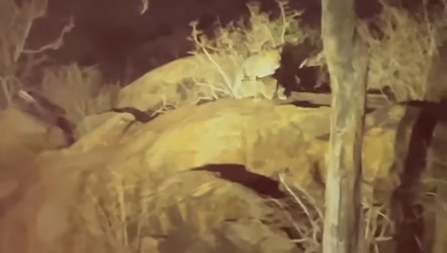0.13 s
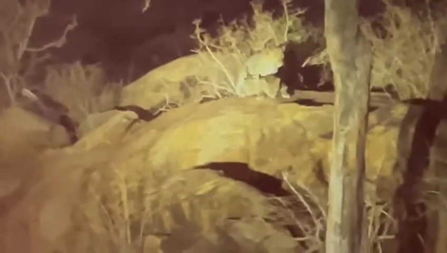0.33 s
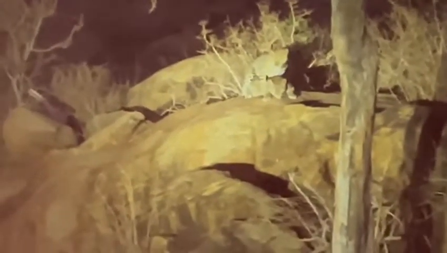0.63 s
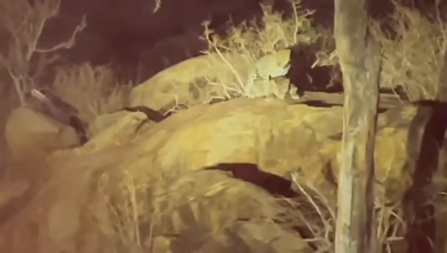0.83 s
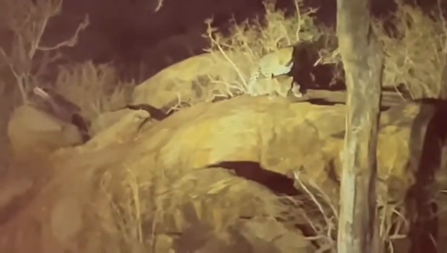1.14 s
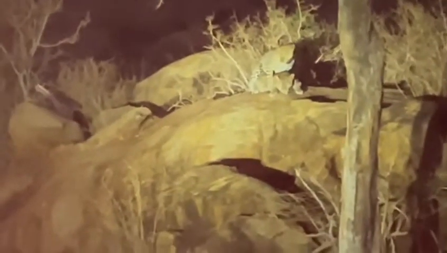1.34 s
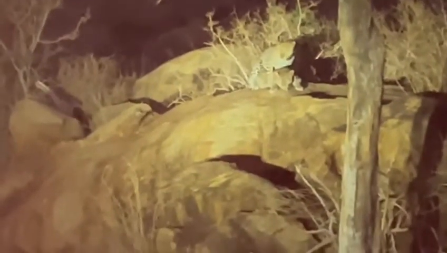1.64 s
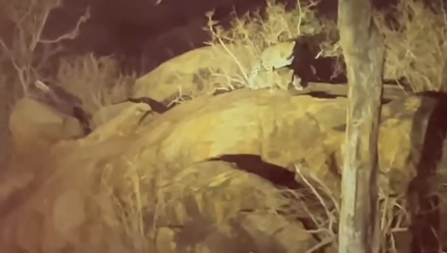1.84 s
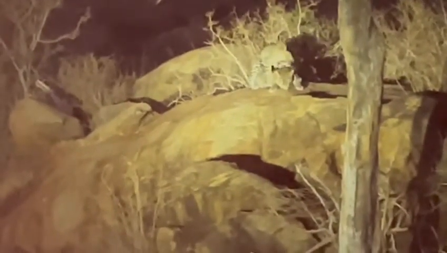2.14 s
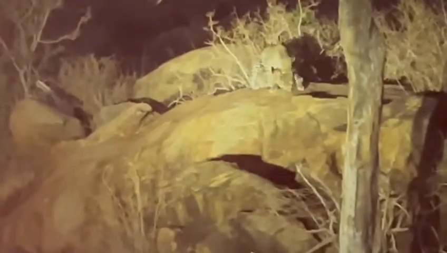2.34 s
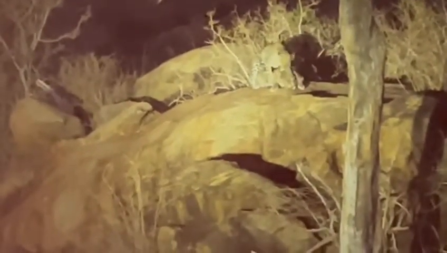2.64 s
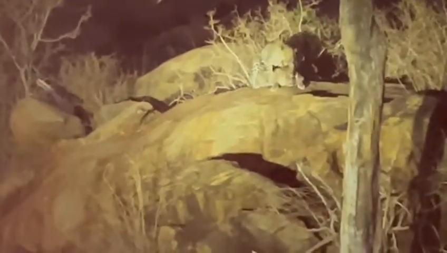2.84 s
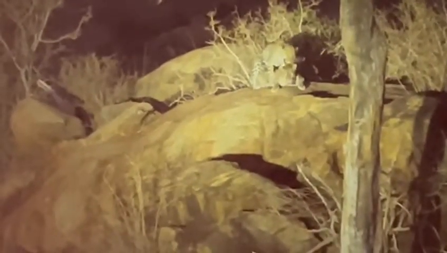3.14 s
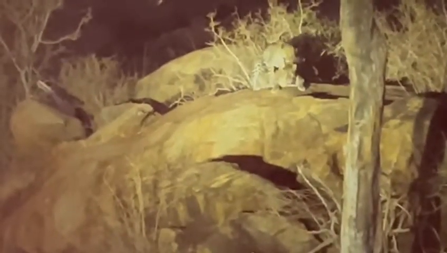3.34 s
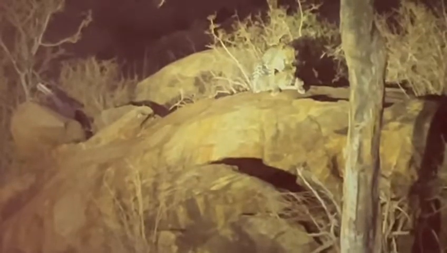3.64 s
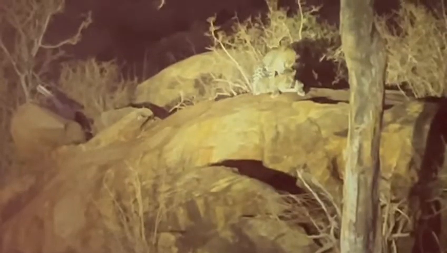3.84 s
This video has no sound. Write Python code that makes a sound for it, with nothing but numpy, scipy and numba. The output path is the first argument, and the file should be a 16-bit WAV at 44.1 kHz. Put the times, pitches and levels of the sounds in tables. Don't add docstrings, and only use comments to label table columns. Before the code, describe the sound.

A leopard's low, raspy growl begins around 2.2 seconds, first a rumbling string of throat pulses, then from 2.9 a brighter, breathy flutter lasting to the 4-second end. Throughout, wind rumbles and thumps the microphone, strongest near 3.7, over bush hiss and a faint throbbing cricket. Dry leaves rustle near 0.7, 1.7 and 2.7-3.0; a thin bird peep sounds at 0.7. Faint rock echoes.

```python
import sys
import numpy as np
from scipy import signal
from scipy.io import wavfile
from scipy.ndimage import uniform_filter1d
from numba import njit

SR = 44100
rng = np.random.default_rng(int(sys.argv[2]) if len(sys.argv) > 2 else 0)


def output_pcm(signal):
    pcm = np.clip(np.atleast_2d(signal).T, -1, 1) * 32767
    wavfile.write(sys.argv[1], SR, np.round(pcm).astype(np.int16))


def level_to_linear(level):
    exponent = np.asarray(level, float) / 20
    return 10 ** exponent


N = 176400


@njit
def svf(x, hz, width):
    y, b, l = np.empty((2, len(x))), 0., 0.
    for i in range(len(x)):
        g, k = np.tan(np.pi * hz[i] / SR), width / hz[i]
        v = (b + g * (x[i] - l)) / (1 + g * (g + k))
        y[0, i], y[1, i] = k * v, l + g * v
        b, l = 2 * v - b, l + 2 * g * v
    return y


def band(x, hz, width):
    return svf(x + 1e-18, hz + np.zeros(len(x)), 1. * width)[0]


def resonate(x, hz, width, skirt):
    return band(band(x, hz, width), hz, skirt * width)


def cut(x, hz, kind, order=8):
    return signal.sosfilt(signal.butter(order, hz, kind, fs=SR, output="sos"), x)


def unit(x):
    return x / np.sqrt(np.mean(x ** 2))


def curve(table, col=1):
    return np.interp(np.arange(N) / SR, np.array(table)[:, 0], np.array(table)[:, col])


def walk(rate):
    k = int(SR / rate)
    held = np.repeat(rng.standard_normal(N // k + 1), k)
    return 1.27 * uniform_filter1d(uniform_filter1d(held, k), k)[:N]


def air(table, flicker_db, rate, shared):
    f, db = np.array(table).T
    out = 0
    for hz in f[0] * 2 ** np.arange(0, np.log2(f[-1] / f[0]) + .1, .5):
        colour_db = np.interp(np.log(hz), np.log(f), db)
        gain = level_to_linear(colour_db + flicker_db * walk(rate) + shared)
        out = out + gain * resonate(rng.standard_normal(N), hz, hz / 2, 1)
    return unit(out)


def wind():
    # [t/s, level/dB]
    gusts = [(0.0, -34.5), (0.6, -35.5), (0.75, -31), (1.01, -36.5), (1.21, -28), (1.36, -26), (1.51, -32),
             (1.68, -26.5), (1.8, -34), (2.02, -32), (2.7, -28.5), (3.12, -26), (3.39, -29), (3.69, -24),
             (4.0, -26.5)]
    # [f/Hz, level per Hz/dB]
    wind_colour = [(13, -53), (22, -18), (51, 4), (90, 6), (140, -1.5), (447, -14.5), (539, -13.5),
                   (900, -30), (1170, -78), (1980, -120)]
    side_db = -6.5
    shared = 2.8 * walk(20)
    mid = air(wind_colour, 1.96, 18, shared)
    side = cut(air(wind_colour, 2.7, 20, shared), 70, "high", order=1)
    return level_to_linear(curve(gusts) - 1) * np.array([mid, level_to_linear(side_db) * side])


def buffets():
    # [t/s, peak level/dB, flap level against thud/dB, length/s]
    swirls = [(0.079, -29.5, -14, 0.027), (0.249, -18, -7.5, 0.012), (0.285, -21, -21, 0.01),
              (0.359, -17, -15.5, 0.018), (0.614, -23.5, -23, 0.028), (0.682, -11.5, -5.5, 0.014),
              (0.872, -25, -23, 0.012), (1.158, -21.5, 4.5, 0.011), (1.178, -12, 1.5, 0.017),
              (1.261, -11, -4.5, 0.015), (1.329, -25, -5, 0.0051), (1.527, -22, -20, 0.018),
              (1.599, -21, -19, 0.011), (1.613, -17, -4.5, 0.01), (1.661, -21, -23, 0.011),
              (1.694, -15, -9.5, 0.021), (1.815, -17, -15, 0.015), (2.062, -19.5, -24, 0.016),
              (2.174, -23.5, -18, 0.014), (2.326, -19.5, -7.5, 0.014), (2.391, -19, -13, 0.015),
              (2.594, -18, -30, 0.019), (2.951, -13, -6.5, 0.012), (2.985, -11.5, -26, 0.02),
              (3.027, -20, 3.5, 0.027), (3.093, -17, 0, 0.02), (3.164, -16.5, -4.5, 0.015),
              (3.518, -20, -21, 0.014), (3.598, -11.5, -4.5, 0.013), (3.635, -10, -12, 0.0052),
              (3.711, -9, -13, 0.026), (3.754, -14, -4, 0.016), (3.787, -21.5, 4.5, 0.015),
              (3.83, -26.5, -11, 0.011)]
    thud_hz, flap_hz, side_db = 241, 520, -12
    out, t = np.zeros((2, N + SR)), np.arange(SR // 4) / SR
    for s, db, flap_db, length in swirls:
        shape = (t / length * np.exp(1 - t / length)) ** 3
        noise = rng.standard_normal((2, 2, len(t)))
        thud = cut(cut(noise[0], thud_hz, "low", order=3), 49.4, "high", order=2) * shape
        flap = cut(cut(noise[1], flap_hz, "low", order=5), thud_hz, "high", order=2) * shape ** 2
        thud = thud / np.abs(thud[0]).max()
        flap = flap / np.abs(flap[0]).max()
        at = int(max(s - .008, 0) * SR)
        out[:, at:at + len(t)] += level_to_linear(db) * (thud + level_to_linear(flap_db) * flap)
    return out[:, :N] * level_to_linear(np.array([[0], [side_db]]))


def bush():
    # [f/Hz, level per Hz/dB]
    hiss_colour = [(240, 2.5), (400, 0), (1260, -7.5), (1890, -9.5), (4170, -24), (8570, -20), (9710, -35),
                   (10100, -72), (11000, -17), (14300, -58), (22000, -120)]
    level_db, side_db, wide_below_hz = -43, -2, 2300
    swell = 1.1 * walk(24)
    mid = level_to_linear(level_db) * air(hiss_colour, 1.0, 9.1, swell)
    side = cut(air(hiss_colour, 1.0, 12, swell), wide_below_hz, "low")
    return np.array([mid, level_to_linear(level_db + side_db) * side])


def cricket():
    # [f/Hz, width/Hz, level/dB]
    wings = [
        (1802, 250, -46.5),
        (1906, 40, -52.5),
        (5240, 160, -65),
    ]
    rate_hz, decay_cycles = 29, 0.48
    phase = np.cumsum(rate_hz * (1 + 0.018 * walk(2.7))) / SR % 1
    scrape = np.minimum(phase / .15, 1) * np.exp(-phase / decay_cycles) * level_to_linear(1.3 * walk(14))
    out = 0
    for f, width, db in wings:
        wavering = f * (1 + 0.033 * walk(15))
        out = out + level_to_linear(db) * unit(resonate(scrape * rng.standard_normal(N), wavering, width, 4))
    return out


def rustles():
    # [centre t/s, half length/s, f/Hz, width/Hz, level/dB]
    grainy_swells = [(0.733, 0.091, 5100, 1800, -52.5), (0.697, 0.065, 3070, 600, -50),
                     (1.685, 0.073, 7700, 6400, -53), (1.69, 0.084, 2650, 970, -52.5),
                     (1.67, 0.04, 6800, 700, -55), (2.78, 0.11, 2850, 670, -52.5),
                     (2.705, 0.13, 9600, 4600, -57.5), (3.04, 0.067, 8440, 2000, -55)]
    t, out = np.arange(N) / SR, 0
    for s, half, hz, width, db in grainy_swells:
        swell = level_to_linear(db + 2 * walk(58.5)) * np.exp(-((t - s) / half) ** 2)
        out = out + swell * unit(resonate(rng.standard_normal(N), hz, width, 2))
    return out


def peep():
    # [t/s, f/Hz]
    glide = [
        (.645, 2980),
        (.7, 3480),
        (.76, 3300),
        (.825, 3020),
    ]
    tone_db, breath_db, blur_hz = -51.5, -56, 200
    t = np.arange(N) / SR
    gate = np.clip(np.minimum(t - glide[0][0], glide[-1][0] - t) / .03, 0, 1)
    hz = uniform_filter1d(curve(glide), size=900) * (1 + .005 * walk(150))
    tone = np.sin(2 * np.pi * np.cumsum(hz) / SR)
    hoarse = unit(resonate(rng.standard_normal(N), curve(glide), blur_hz, 1))
    return gate * (level_to_linear(tone_db + 3 * walk(90)) * tone + level_to_linear(breath_db) * hoarse)


def growl():
    # [t/s, peak level/dB, length/s, first
    # resonance ring/dB]
    bursts = [(2.196, -17.5, 0.05, 1.5), (2.269, -24, 0.067, 3), (2.318, -26, 0.031, 1.5),
              (2.351, -19.5, 0.072, 1), (2.441, -11, .01, -12), (2.465, -13.5, 0.047, -0.5),
              (2.519, -13.5, 0.018, -0.5), (2.545, -13.5, .02, -3.5), (2.576, -16.5, 0.051, -2),
              (2.617, -14.5, 0.012, -6), (2.647, -16, 0.043, -4.5), (2.698, -9.5, 0.028, -4.5),
              (2.736, -11.5, 0.031, 0), (2.783, -16.5, 0.037, 0.5), (2.818, -14, 0.027, -1),
              (2.853, -17, 0.011, 2), (2.869, -18, 0.027, 0.5),
              (2.907, -15, 0.019, 4), (2.947, -16.5, .034, -13), (2.996, -11.5, 0.014, 0),
               (3.035, -15, 0.027, -0.5), (3.068, -13.5, 0.024, -6.5), (3.117, -16, 0.028, 1),
               (3.167, -26.5, 0.031, 4), (3.198, -11.5, 0.0029, -3.5), (3.237, -15, 0.0086, -7),
               (3.266, -22, 0.016, -3.5), (3.286, -18, 0.024, 0), (3.318, -23, .006, 0),
               (3.331, -16.5, .008, 2), (3.357, -16.5, 0.0096, 6), (3.391, -17, .034, 2.5),
               (3.456, -20.5, 0.02, 4), (3.506, -13.5, 0.017, 1.5), (3.553, -21.5, .034, 2),
               (3.613, -20.5, 0.02, 7), (3.664, -20, .006, 2), (3.679, -14.5, 0.0058, 3),
               (3.705, -21, 0.053, 3.5), (3.784, -21, .006, -4), (3.797, -19, 0.02, 1.5),
               (3.853, -16.5, 0.032, 2.5), (3.917, -14.5, 0.037, -1), (3.984, -16.5, .03, -6)]
    # [t/s, first resonance f/Hz, brightness/dB, lift of upper resonances (ratio), breath/dB]
    mouth = [(2.19, 605, -4, 0.93, -5), (2.32, 545, -15.5, 0.93, -9), (2.52, 520, -17.5, 1.04, 3),
             (2.66, 541, -15, 1.074, -9), (2.74, 574, -8, 1.074, 2), (2.93, 610, -1, 0.973, -5),
             (3.4, 631.5, 1.5, 0.968, 3), (3.7, 629, 1, .98, -3.5), (4.0, 609, -3.5, 0.97, 1)]
    # [f/Hz, width/Hz, level/dB]
    tract = [(1002, 153, -10), (1476, 193, -6), (1968, 293, -4.5), (2290, 376, -5.5), (3480, 720, -20),
             (5500, 5000, -16)]
    pulse_s, gate_s, puff_s, breath_s = .0135, 0.0059, .002, .03
    jitter, scatter_db, waver, patchy_db = .055, 1.8, .02, 2.2
    rough, breath = .9, .07
    first_width_hz, open_db, level_db = 50, 60, -1

    pulses = np.zeros((2, N + SR))
    for s, db, length, ring_db in bursts:
        chance = np.clip(rng.standard_normal((12, 2)), -1.5, 1.5)
        gaps = pulse_s * (1 + jitter * chance[:, 0])
        late = np.cumsum(gaps) - gaps[0]
        size = level_to_linear(db + scatter_db * chance[:, 1]) / (1 + np.exp((late - length) / gate_s))
        pulses[:, ((s + late) * SR).astype(int)] += size * level_to_linear(np.array([[ring_db], [0]]))
    pulses, t = pulses[:, :N], np.arange(800) / SR

    puff_shape = t / puff_s * np.exp(-t / puff_s)
    puffs = signal.fftconvolve(pulses, puff_shape[None], axes=1)[:, :N]
    steady = uniform_filter1d(pulses, int(breath_s * SR)) * pulse_s * SR
    flow = rough * puffs + breath * level_to_linear(curve(mouth, col=4)) * steady
    hiss = flow * .2 * rng.standard_normal(N)

    hz = curve(mouth) * (1 + waver * walk(25))
    bright_db, lift = curve(mouth, col=2), curve(mouth, col=3)
    first = resonate(pulses[0] + hiss[0] / 2, hz, first_width_hz, 2.5)
    first = first * SR / first_width_hz / 2 / np.pi
    upper = 0
    for k, (f, width, db) in enumerate(tract):
        gain_db = db + bright_db * min(k, 1) + patchy_db * walk(70)
        if k > 2:
            gain_db = gain_db + open_db * np.maximum(lift - 1, 0)
        drive = (pulses[1] + hiss[1]) * level_to_linear(gain_db)
        f = f * lift * (1 + 1.47 * waver * walk(30.04))
        upper = upper + (-1) ** k * resonate(drive, f, width, 2) * SR / width / 2 / np.pi
    return level_to_linear(level_db) * (first + upper)


def rocks(x):
    t60_s, level_db, dull_hz = 0.83, -22.5, 2420
    t = np.arange(SR // 2) / SR
    tail = cut(rng.standard_normal((2, len(t))), dull_hz, "low", order=2)
    tail = tail * level_to_linear(-60 * t / t60_s) * (t > .004)
    tail = tail / np.sqrt(np.sum(tail ** 2, axis=1, keepdims=True))
    return level_to_linear(level_db) * signal.fftconvolve(x[None], tail, axes=1)[:, :N]


def starve(x, lo_hz, hi_hz, db, size):
    f, _, z = signal.stft(x, SR, nperseg=2048, noverlap=1024)
    rows = len(f) // size * size
    power = (np.abs(z[:rows]) ** 2).reshape(-1, size, z.shape[1]).mean(axis=1) + 1e-20
    usual = np.median(power, axis=1, keepdims=True)
    keep = np.repeat(power > usual * level_to_linear(2 * db), size, axis=0)
    outside = (f[:rows] < lo_hz) | (f[:rows] > hi_hz)
    z[:rows] *= keep | outside[:, None]
    return signal.istft(z, SR, nperseg=2048, noverlap=1024)[1][:N]


def scene():
    chirr, bird, cat = cricket(), peep(), growl()
    centre = cat + rustles() + bird + chirr
    mid, side = wind() + buffets() + bush() + np.array([centre, .5 * bird])
    return np.array([mid + side, mid - side]) + rocks(cat + chirr)


def steep(x, hz, kind):
    return signal.sosfiltfilt(signal.ellip(8, .2, 60, hz, kind, fs=SR, output="sos"), x)


def low_pass(x):
    return signal.sosfilt(signal.butter(12, 11870, fs=SR, output="sos"), x)


def record(dry):
    turn_lo_hz, turn_hi_hz, back_hz, top_hz = 9550, 10900, 10800, 11550
    opposed_db = 4.5
    dry = cut(dry, 46, "high", order=3)
    mid, side = (dry[0] + dry[1]) / 2, (dry[0] - dry[1]) / 2
    opposed = np.roll(steep(steep(mid, turn_lo_hz - 300, "high"), back_hz, "low"), 2000)
    side = starve(steep(side, 3800, "low"), 2050, 4000, 7, size=12) + level_to_linear(opposed_db) * opposed
    top = steep(steep(mid, turn_hi_hz, "high"), top_hz, "low")
    mid = steep(mid, turn_lo_hz, "low") + level_to_linear(-1.0) * top
    mid = starve(mid, 3500, 9800, -5, size=4)
    mid = starve(mid, 10000, 12000, .3, size=12)
    return low_pass(np.array([mid + side, mid - side]))


dry = scene()
out = record(dry)
output_pcm(out)
```